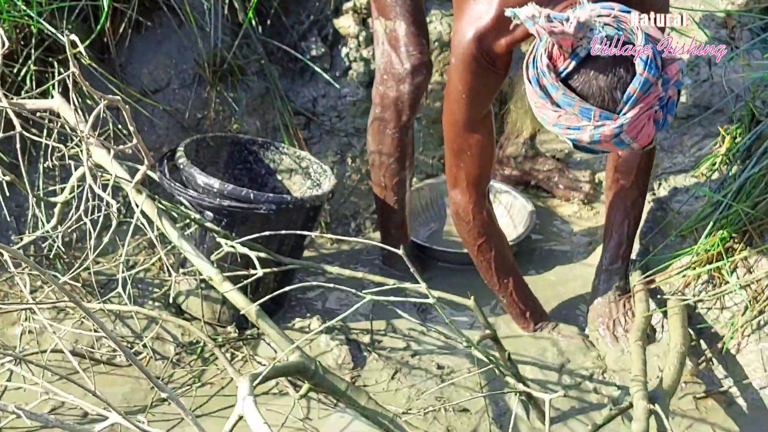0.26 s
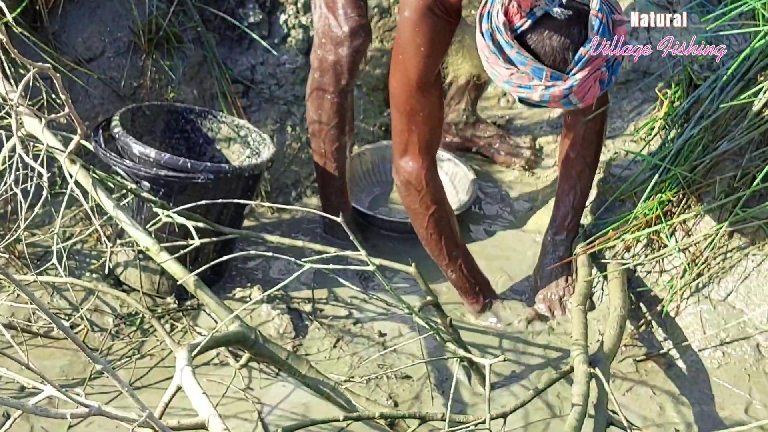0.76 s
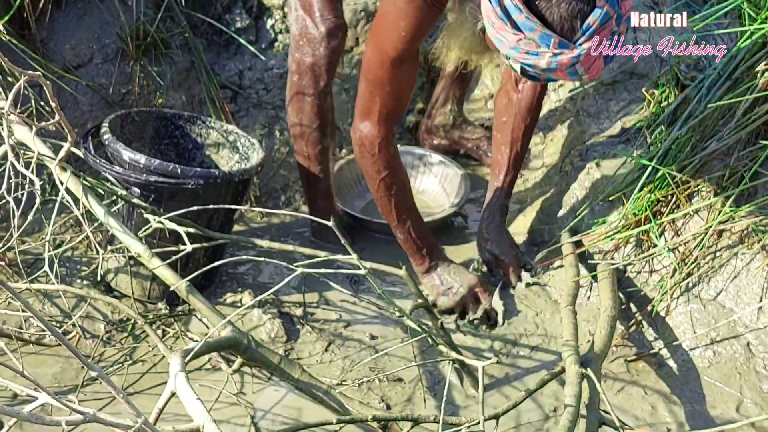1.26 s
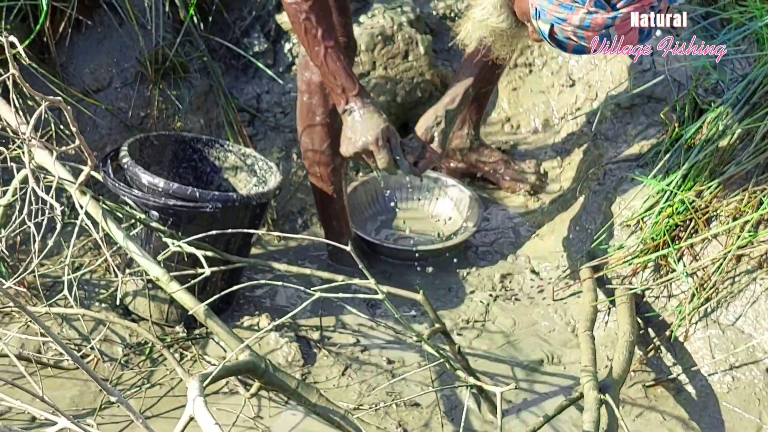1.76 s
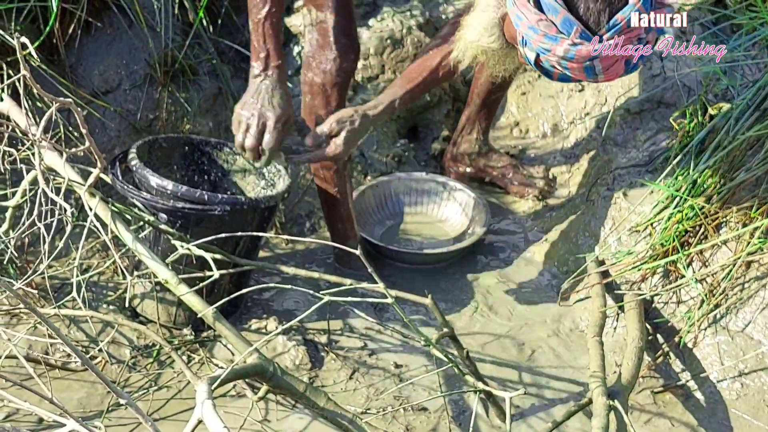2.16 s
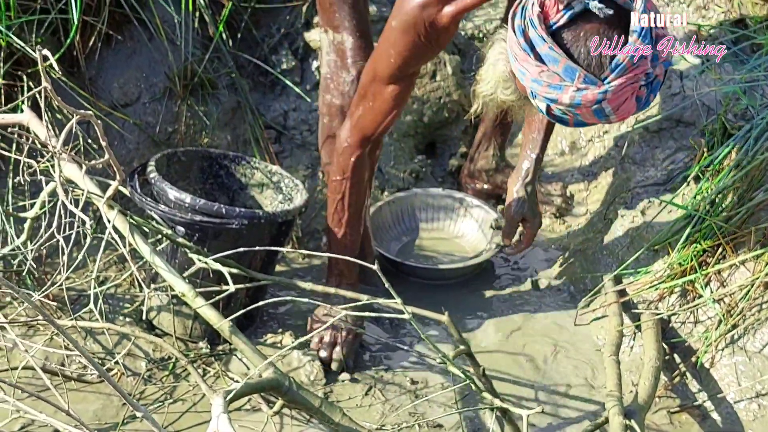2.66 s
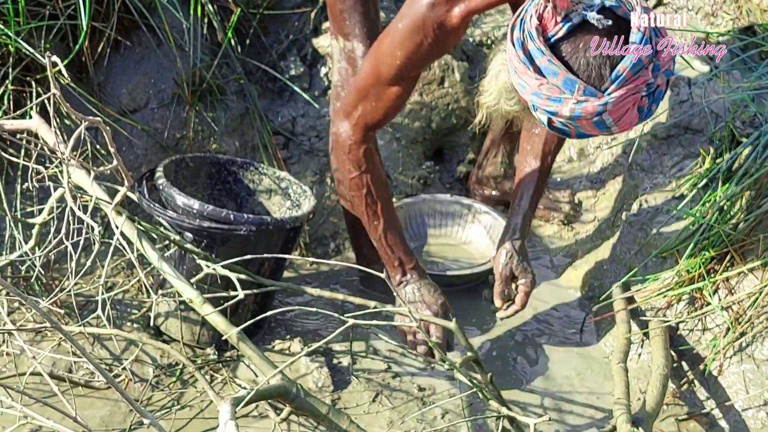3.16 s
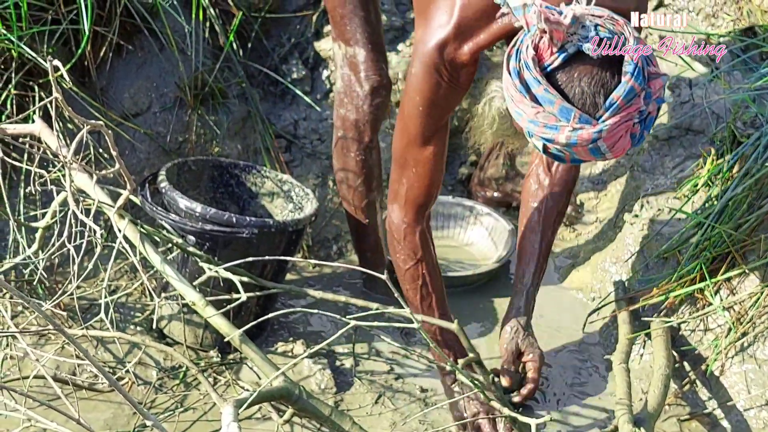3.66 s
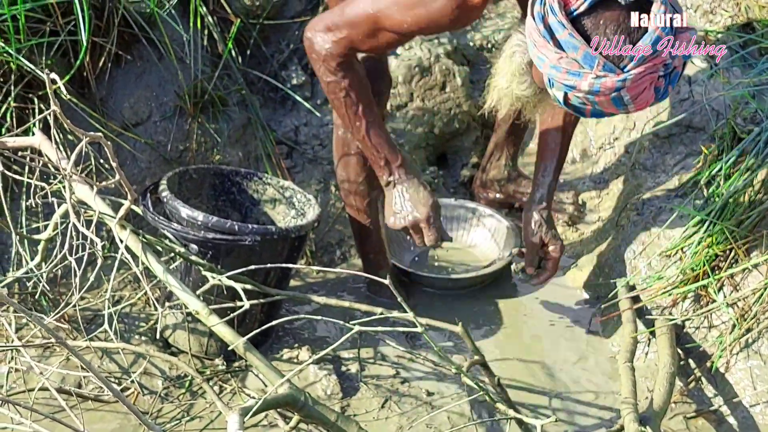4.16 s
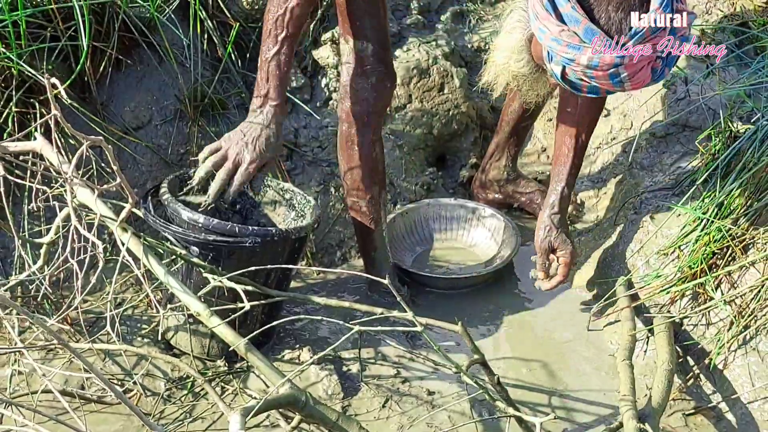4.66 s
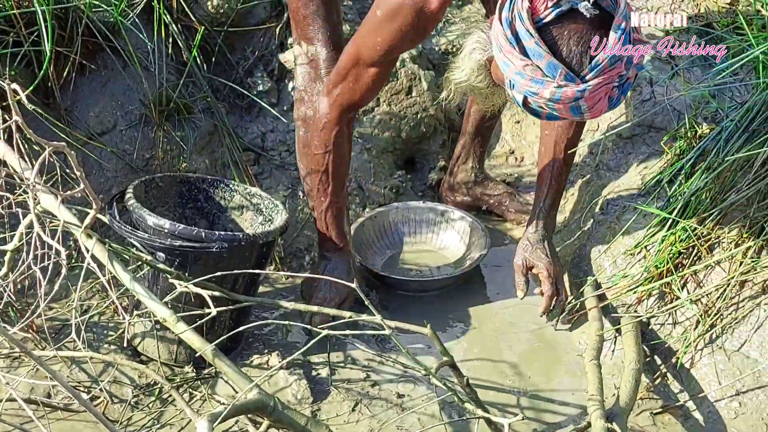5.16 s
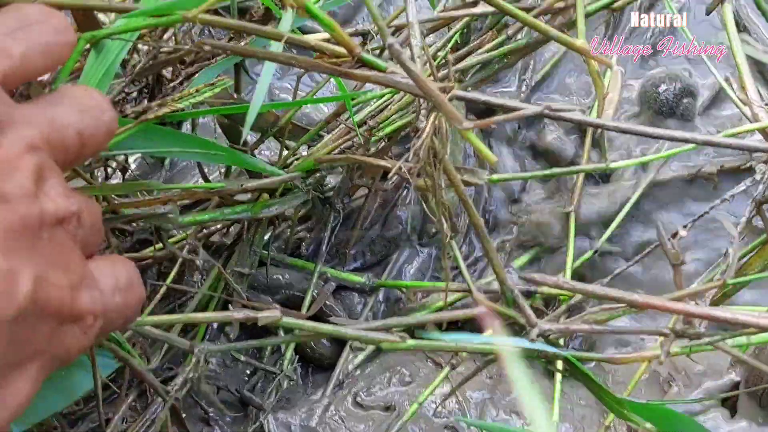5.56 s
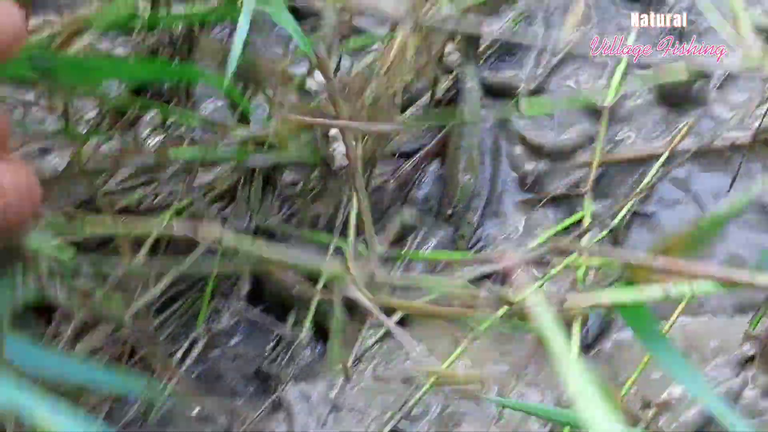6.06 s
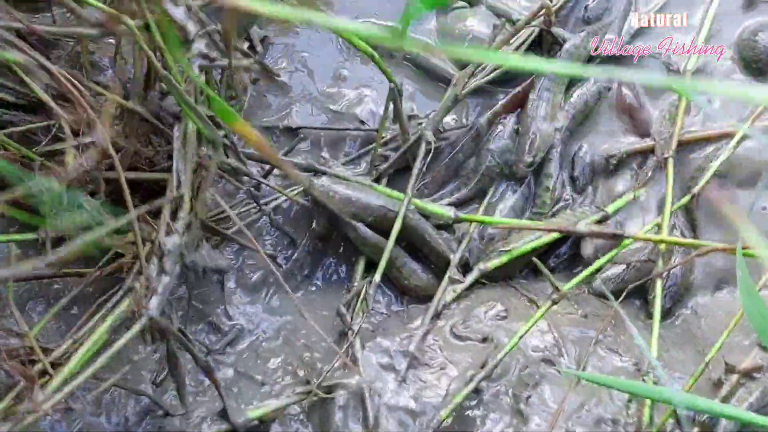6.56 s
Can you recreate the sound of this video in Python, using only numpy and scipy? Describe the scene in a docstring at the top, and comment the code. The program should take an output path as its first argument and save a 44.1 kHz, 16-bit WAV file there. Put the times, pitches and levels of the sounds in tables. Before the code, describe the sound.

Wet squelches, plops and splats of hands picking fish from mud, over a steadily chugging pump engine and faint birdsong.

```python
"""A single-cylinder pump engine thuds across a paddy field, each exhaust pulse ringing its pipe, while
hands pick fish out of wet mud: water films burst, bubbles resonate and lumps spatter. A bird soon sings
buzzy, frequency-modulated notes. From 2.8 s occasional knocks ring the casing at the right microphone
port, and after 4 s the bird adds a rasp, trills and a sweep. Near 5.7 s the listening place changes to
a grassy hollow, where a bank dulls the engine and a wet hiss swells as the fish wriggle."""
import sys
import numpy as np
from scipy import signal
from scipy.fft import rfft, irfft, next_fast_len
from scipy.io import wavfile
from scipy.ndimage import uniform_filter1d, map_coordinates

SR = 44100
rng = np.random.default_rng(int(sys.argv[2]) if len(sys.argv) > 2 else 0)


def materialize(psi):
    """Save the field psi as 16-bit PCM at rate SR to the path in sys.argv[1].

    A 1-D psi becomes a single channel; in a 2-D psi each row is a channel.
    """
    bounded = np.clip(np.atleast_2d(psi).T, -1, 1)
    quanta = np.round(bounded * 32767).astype(np.int16)
    wavfile.write(sys.argv[1], SR, quanta)


N = 299439
TIME = np.arange(N) / SR
MOVE_S = 5.745  # from the open field to the hollow
ROUGHNESS = 0.255  # random share of the bird's pitch flutter

# Spectrum of stirred water: frequency_hz, level_db
SLOSH_SPECTRUM = [(300, 3.5), (500, -4), (750, -9), (1000, -8), (1600, -10.5), (2200, 5), (2800, -4),
                  (4500, -7), (8000, -46)]
# Spectrum of fine spray: frequency_hz, level_db
SPRAY_SPECTRUM = [(710, -54), (1200, -65), (2220, -18), (3270, -11), (3850, 1), (6250, -5), (7590, -0.5),
                  (8730, -5.5), (10500, 4), (14700, 2), (15800, -11)]


def amp(db):
    """Amplitude ratio of a level in decibels."""
    return 10 ** (np.asarray(db) / 20)


def unit(x):
    """Normalisation to an rms of 1."""
    return x / np.sqrt(np.mean(x ** 2) + 1e-20)


def gain(points, size):
    """Magnitude response on an FFT grid, interpolated from (frequency_hz, level_db) points."""
    hz, db = np.transpose(points)
    return amp(np.interp(np.log(np.fft.rfftfreq(size, 1 / SR) + 1), np.log(hz), db))


def colour(x, points):
    """Zero-phase filtering by a response of (frequency_hz, level_db) points."""
    size = next_fast_len(x.shape[-1] + 4096)
    return irfft(rfft(x, size) * gain(points, size), size)[..., :x.shape[-1]]


def impulse(points, size=8192):
    """Minimum-phase pulse of peak 1 with the given spectrum, by folding the cepstrum."""
    cepstrum = irfft(np.log(gain(points, size)))
    cepstrum[1:size // 2] *= 2
    cepstrum[size // 2 + 1:] = 0
    pulse = irfft(np.exp(rfft(cepstrum)))
    return pulse / np.abs(pulse).max()


def curves(rows):
    """Linear interpolation, sample by sample, of each column after the time."""
    times, *columns = np.transpose(rows)
    return [np.interp(TIME, times, column) for column in columns]


def during(rows):
    """A gate from the first row's time to the last, with 10 ms ramps."""
    return np.clip(np.minimum(TIME - rows[0][0], rows[-1][0] - TIME) * 100, 0, 1)


def wobble(rate_hz):
    """Smooth random modulation: a spline through Gaussian knots."""
    knots = rng.standard_normal(int(N * rate_hz / SR) + 4)
    return map_coordinates(knots, [TIME * rate_hz])


def pan(left_db):
    """Channel gains for a level difference, left minus right."""
    return amp([[left_db / 2], [-left_db / 2]])


def ports(x, right_lead_s):
    """Arrival-time difference: the wave reaches the right microphone port first."""
    return np.array([np.interp(TIME + side * right_lead_s / 2, TIME, x) for side in (-1, 1)])


def noise_pair(correlation, size=N):
    """Two white noises, partly coherent through a shared component."""
    noise = rng.standard_normal((3, size))
    return np.sqrt(correlation) * noise[0] + np.sqrt(1 - correlation) * noise[1:]


def add(track, start_s, sound):
    """Superposition of a sound on the track."""
    start = max(round(start_s * SR), 0)
    part = track[..., start:start + sound.shape[-1]]
    part += sound[..., :part.shape[-1]]


def move(in_field, in_hollow):
    """A 5 ms crossfade between the two listening places."""
    share = np.clip((TIME - MOVE_S) * 200, 0, 1)
    return (1 - share) * in_field + share * in_hollow


def background():
    """Steady noise of faint air and engine rumble; in the hollow the bank casts an acoustic shadow."""
    # Spectra of the rumble and of the open air: frequency_hz, level_db
    rumble_spectrum = [(20, -40), (36, -47), (43, -60), (50, -1), (75, 4), (95, -4), (125, 1), (240, -9.5),
                       (330, -9), (430, -26.5), (700, -87)]
    air_spectrum = [(240, -18), (400, -0.5), (535, -8), (784, -6), (1300, -8.5), (1790, -12.5), (3250, -25),
                    (4290, -23), (6780, -34), (8530, -33.5), (11100, -25.5), (13500, -26), (15500, -39)]
    # Shielding by the bank: frequency_hz, gain_db
    bank_response = [(50, -2), (100, -4), (240, -7), (340, -7)]
    rumble = amp(-41.5) * unit(colour(noise_pair(0.84), rumble_spectrum)) * pan(-2.6)
    air_db = np.where(TIME < MOVE_S, -56.7, -66) + wobble(3.93)
    air = amp(air_db) * unit(colour(noise_pair(0.061), air_spectrum)) * pan(1)
    return move(rumble, colour(rumble, bank_response)) + air


def scattered(x, t60_s):
    """Diffuse reflection from grass and banks: a decaying noise response for each channel."""
    t = np.arange(SR // 5) / SR
    tail = rng.standard_normal((2, len(t))) * amp(-60 * t / t60_s)
    return signal.fftconvolve(x[None], tail / np.linalg.norm(tail[0]), axes=1)[:, :N]


def bird_note(length_s, start_hz, end_hz, depth, overtone_db, buzz_hz=172.5):
    """Uneven flutter of the syrinx modulates the frequency of an arched glide into a buzz."""
    t = np.arange(int(length_s * SR)) / SR
    progress = t / length_s
    arch = np.sin(np.pi * progress)
    hz = (start_hz + (end_hz - start_hz) * progress) * (1 + 0.0156 * arch)
    waver, drift = (unit(uniform_filter1d(rng.standard_normal(len(t)), size=90)) for _ in range(2))
    flutter = np.sin(2 * np.pi * buzz_hz * np.cumsum(1 + 0.096 * drift) / SR)
    phase = 2 * np.pi * np.cumsum(hz * (1 + depth * (flutter + ROUGHNESS * waver))) / SR
    swell = np.sqrt(np.abs(arch)) * (1 + 0.044 * flutter)
    return swell * (np.sin(phase) + amp(overtone_db) * (np.sin(2 * phase) + 1.6 * np.sin(3 * phase)))


def bird_rasp(pulse_hz=170, slide=0.08):
    """Amplitude modulation cuts a reedy, inharmonic tone into a fast train of falling chirps."""
    # A call that swells as it rises, then is held softly: time_s, pitch_hz, level_db
    contour = [(4.19, 2800, -66), (4.23, 3350, -52), (4.28, 3580, -48.5), (4.36, 3680, -49),
               (4.41, 3900, -53), (4.46, 4350, -48), (4.56, 4550, -46), (4.61, 3700, -66), (4.7, 3500, -60),
               (4.78, 3600, -54), (4.88, 3570, -58.5), (4.97, 3600, -60)]
    # Partials of the voice: frequency_ratio, level_db
    partials = [(1, 0), (.83, -10), (1.8, -19), (2, -21), (2.68, -19), (3.05, -24)]
    hz, db = curves(contour)
    cycle = np.cumsum(pulse_hz * (1 + .03 * wobble(40))) / SR % 1
    phase = 2 * np.pi * np.cumsum(hz * (1 + slide * (.5 - cycle) + .02 * wobble(500))) / SR
    voice = sum(amp(level_db) * np.sin(ratio * phase) for ratio, level_db in partials)
    pulses = unit(np.sin(np.pi * cycle) ** 2)
    call = amp(db + 1 + wobble(150)) * during(contour) * pulses * voice
    return call * pan(-3) + amp(-9) * scattered(call, t60_s=.04)


def bird_sweep(buzz_hz=152):
    """A whistle rises and falls back; deeper frequency modulation roughens it near the top."""
    # Course of the whistle: time_s, pitch_hz, level_db, buzz_depth_ratio
    contour = [(5.38, 3450, -60, .05), (5.46, 3980, -47, .05), (5.485, 4150, -40, .05),
               (5.525, 4520, -40, .055), (5.555, 4850, -41, .1), (5.582, 4720, -44, .1),
               (5.605, 4200, -52, .09), (5.665, 3850, -56, .07)]
    hz, db, depth = curves(contour)
    flutter = np.sin(2 * np.pi * np.cumsum(buzz_hz * (1 + .05 * wobble(40))) / SR)
    phase = 2 * np.pi * np.cumsum(hz * (1 + depth * (flutter + ROUGHNESS * wobble(500)))) / SR
    call = amp(db - 2) * during(contour) * (1 + 0.16 * flutter) * np.sin(phase)
    return call * pan(-2) + amp(-7) * scattered(call, t60_s=.04)


def bird():
    """Notes, trills, rasp and sweep arrive as direct sound plus diffuse reflections."""
    # Buzzy notes: start_s, length_s, start_hz, end_hz, level_db, buzz_depth_ratio
    notes = [(0.565, 0.068, 4080, 3750, -63.5, 0.045), (0.566, 0.12, 2484, 2280, -60, 0.049),
             (1.04, 0.067, 4080, 4400, -66.5, 0.022), (3.25, 0.11, 4460, 4770, -65.5, 0.06),
             (3.367, 0.086, 4170, 5520, -61.5, 0.064), (3.433, 0.12, 5800, 5400, -65.5, 0.023),
             (3.54, 0.046, 5400, 4570, -70, .045), (3.57, 0.15, 4070, 4380, -62, 0.085),
             (3.82, 0.038, 4200, 3600, -58, 0.059), (3.882, 0.084, 1920, 2370, -58, 0.059),
             (4.07, 0.13, 2330, 2630, -60.5, 0.096), (5.159, 0.21, 3890, 4220, -57.5, 0.1),
             (5.655, 0.095, 2610, 2270, -54, 0.047), (5.893, 0.13, 3060, 4730, -65, 0.026)]
    # Runs of four clear falling chirps: start_s, spacing_s, start_hz, end_hz, level_db
    trills = [(4.873, .017, 7200, 4400, -60), (4.948, .037, 3950, 3200, -51)]
    song = np.zeros(N)
    for start_s, length_s, start_hz, end_hz, db, depth in notes:
        add(song, start_s, amp(db) * bird_note(length_s, start_hz, end_hz, depth, overtone_db=-33))
    for start_s, spacing_s, start_hz, end_hz, db in trills:
        for k in range(4):
            chirp = bird_note(.6 * spacing_s, start_hz, end_hz, depth=.015, overtone_db=-30)
            add(song, start_s + k * spacing_s, amp(db) * chirp)
    return amp(4) * song + amp(5.5) * scattered(song, t60_s=.039) + bird_rasp() + bird_sweep()


def knocks():
    """An impact at the right port clicks and excites the damped modes of the casing."""
    # Impacts: start_s, level_db
    taps = [(2.8154, -17), (2.8205, -6), (4.0567, 12), (4.0632, -5), (5.066, -6.5), (5.0756, -9.5),
            (5.0879, -13), (5.097, -15), (5.699, -20.5), (5.7393, -21.5)]
    # Modes of the casing: frequency_hz, level_db, t60_s
    modes = [(55.4, -19, 0.24), (136, -9.5, 0.055), (246, -10.5, 0.053), (325, -6, 0.03), (504, -7, 0.021),
             (647, -6, 0.015), (793, -15.5, 0.013), (1100, -14, 0.011)]
    click_spectrum = [(500, 28.5), (1150, 4), (1700, -33), (2700, 16.5), (5500, -18), (15000, -4)]
    out, t = np.zeros(N), np.arange(SR // 5) / SR
    ring = sum(amp(db - 60 * t / t60_s) * np.sin(2 * np.pi * hz * t) for hz, db, t60_s in modes)
    hardest_db = max(db for _, db in taps)
    for start_s, db in taps:
        click = unit(colour(rng.standard_normal(len(t)), click_spectrum))
        click_db = -4.5 - .3 * min(hardest_db - db, 10) - 60 * t / 0.011  # soft taps are duller
        add(out, start_s, amp(db - 9.5) * (amp(click_db) * click - ring))
    highpass = signal.butter(2, 70, "high", fs=SR, output="sos")
    return signal.sosfilt(highpass, out) * amp([[-25], [0]])


def ticks(rate_hz, spread_db, size=N):
    """Shot noise: tiny decaying bursts at random times and of scattered strength."""
    strengths = amp(spread_db * np.minimum(rng.exponential(size=size), 3))
    pops = (rng.random(size) < rate_hz / SR) * strengths * rng.choice([-1, 1], size)
    decay = np.exp(-np.arange(SR // 200) / (0.00039 * SR))
    return unit(signal.fftconvolve(pops, decay)[:size] * noise_pair(0.0093, size))


def crackle(spectrum, rate_hz, spread_db, fizz):
    """Bursting water films make shot noise over a continuous fizz."""
    return unit(colour(ticks(rate_hz, spread_db) + fizz * noise_pair(0.3), spectrum))


def bubbles(rate_hz, centre_hz, scatter, spread_db, cycles):
    """Air pockets resonate at random times, rising in pitch; the higher ones die away sooner."""
    count = int(rate_hz * N / SR)
    onset, left_share, phase_shift = rng.random((count, 3)).T[..., None]
    pitch, strength = np.clip(rng.standard_normal((count, 2)), -2, 2).T[..., None]
    hz = centre_hz * np.exp(scatter * pitch)
    t = np.arange(SR // 40) / SR
    age = t * hz / cycles
    envelope = amp(spread_db * strength) * np.exp(-age) * (1 - np.exp(-4 * age))
    phase = 2 * np.pi * hz * t * (1 + 0.0048 * age)
    left = left_share * envelope * np.sin(phase)
    right = (1 - left_share) * envelope * np.sin(phase + np.pi * phase_shift)
    samples = ((onset * N).astype(int) + np.arange(len(t))).ravel()
    return unit(np.array([np.bincount(samples, ring.ravel(), N)[:N] for ring in (left, right)]))


def wriggling_fish(start_s=6.105, rise_s=0.36, trickle_lead_s=0.16):
    """Films burst and bubbles ring among the fish, swelling as they begin to wriggle."""
    # Spectrum of fizzing water: frequency_hz, level_db
    hiss_spectrum = [(350, -6.5), (520, 2.5), (750, -12), (1200, -13), (2200, -2.5), (3400, -6), (4100, -2),
                     (5900, -6.5), (7400, -3.5), (8600, -7), (11000, 0), (13300, 1.5), (15800, -2)]
    effort = (TIME - start_s) / rise_s
    hiss_db = np.interp(effort, [0, 1], [-51.5, -35.5]) + 0.096 * wobble(2.5)
    trickle_db = np.interp(effort + trickle_lead_s / rise_s, [0, 1], [-66.5, -53.5])
    hiss = crackle(hiss_spectrum, rate_hz=900, spread_db=4, fizz=1.1)
    clumps = amp(4 * wobble(30))
    drops = unit(clumps * bubbles(rate_hz=150, centre_hz=2350, scatter=.25, spread_db=5.5, cycles=4))
    trickle = drops + crackle(SLOSH_SPECTRUM, rate_hz=120, spread_db=5, fizz=0.39)
    return amp(hiss_db) * hiss * pan(-4) + amp(trickle_db) * trickle * pan(-2.6)


def stroke(peak_s, length_s, press_share=0.57, range_db=23):
    """Force grows exponentially as a hand presses in and decays as it draws out."""
    offset = (TIME - peak_s) / length_s
    return amp(-range_db * np.maximum(-offset / press_share, offset / (1 - press_share)))


def hands():
    """Fingers squeeze crackle from the mud and stir the water; overlapping strokes add in power."""
    # Strokes through the mud: peak_s, length_s, crackle_db, slosh_db
    strokes = [(0.064, 1, -47.5, -50.5), (0.83, 1, -53, -89), (1.408, 0.19, -43.5, -40.5),
               (1.557, 1, -47.5, -40), (1.948, 1, -48.5, -68), (2.274, 0.4, -47, -43.5),
               (2.725, 1, -56, -54), (3.205, 0.28, -54.5, -44.5), (4.532, 0.37, -41.5, -43),
               (4.667, 0.83, -49.5, -51), (5.105, 0.34, -45, -39), (5.316, 0.26, -38.5, -63),
               (5.515, 1, -44.5, -50)]
    # Spectrum of squeezed mud: frequency_hz, level_db
    mud_spectrum = [(1470, -34), (2500, -3), (3220, 4), (4360, 6.5), (6210, -1.5), (7650, -1), (8660, -3.5),
                    (10300, 2.5), (12800, 2.5), (15100, -3), (15800, 5.5)]
    seep_db, lap_db = -70, -54.5  # what remains between strokes
    forces = np.array([stroke(peak_s, length_s) for peak_s, length_s, _, _ in strokes])
    _, _, crackle_db, slosh_db = np.transpose(strokes)
    squeeze = np.hypot(amp(seep_db), np.linalg.norm(amp(crackle_db)[:, None] * forces, axis=0))
    stir = np.hypot(amp(lap_db), np.linalg.norm(amp(slosh_db)[:, None] * forces, axis=0))
    flicker = amp(-1 + 3 * wobble(18) + 3 * wobble(110))
    squelch = squeeze * flicker * crackle(mud_spectrum, rate_hz=200, spread_db=4.5, fizz=.85)
    pops = amp(-65.5) * bubbles(rate_hz=49, centre_hz=2460, scatter=0.203, spread_db=-1.5, cycles=8.2)
    wash = amp(-7 + 2 * wobble(70)) * crackle(SLOSH_SPECTRUM, rate_hz=320, spread_db=4, fizz=0.7)
    churn = np.minimum(stir / amp(-37), 1)  # harder stirring traps more air
    small = bubbles(rate_hz=600, centre_hz=2250, scatter=.16, spread_db=3, cycles=6)
    large = bubbles(rate_hz=400, centre_hz=1050, scatter=.2, spread_db=3, cycles=4)
    gurgle = churn * (amp(-5.5) * small + amp(-6.5) * large)
    return (squelch + pops) * pan(-2.9) + stir * (wash + gurgle) * pan(-9)


def plops(t60_s=0.05):
    """Single bubbles ring as damped resonators of rising pitch, with a wet band of noise."""
    # Bubbles popping in the mud: start_s, pitch_hz, level_db
    pops = [(0.125, 1360, -22), (.126, 1150, -32), (0.126, 2140, -26), (0.153, 2220, -28.5),
            (.272, 2430, -44), (0.395, 2750, -41), (.483, 2250, -34), (0.869, 2710, -46),
            (0.332, 2540, -44), (.566, 2450, -38), (0.945, 2710, -43), (1.02, 2650, -46.5),
            (1.2326, 2140, -39), (2.637, 2500, -43.5), (2.745, 3050, -53), (2.955, 2310, -40),
            (3.018, 2190, -42), (3.153, 2820, -33), (1.373, 2260, -29), (1.391, 2340, -31),
            (1.42, 2320, -29), (1.438, 1070, -30.5), (1.441, 2110, -30), (1.469, 910, -26.5),
            (1.485, 2230, -25), (1.513, 980, -26.5), (1.513, 2120, -25.5), (1.525, 790, -31.5),
            (1.664, 2660, -29.5), (1.777, 780, -36), (2.276, 2430, -30), (3.765, 4200, -28.5),
            (3.977, 2440, -34), (4.915, 880, -27), (4.963, 2104, -25), (4.9645, 3320, -34.5),
            (5.101, 1310, -31), (5.112, 910, -32), (5.726, 2310, -29), (5.851, 1720, -42),
            (6.259, 3510, -34), (6.283, 2290, -33), (6.31, 1940, -35), (6.328, 2130, -34),
            (6.379, 2460, -28.5), (6.443, 2400, -35), (6.485, 2120, -23.5), (6.65, 2190, -29.5),
            (6.73, 928, -29.5), (6.776, 2600, -27)]
    out, t = np.zeros((2, N)), np.arange(SR // 10) / SR
    attack = 1 - np.exp(-t / 0.00015)
    for start_s, hz, db in pops:
        tone = np.sin(2 * np.pi * hz * (t + 0.116 * t * t / t60_s))
        band = [(hz / 2, -25), (hz, 0), (hz * 2, -20), (hz * 4, -40)]
        edge = unit(colour(noise_pair(0.66, len(t)), band))
        add(out, start_s, amp(db - 60 * t / t60_s) * attack * (0.36 * tone + 0.18 * edge))
    return out * pan(-12)


def snaps(film_t60_s=0.038, slap_t60_s=0.009):
    """Broadband transients: a water film ruptures with a bright spit; a hard slap is shorter still."""
    # Films breaking between the fingers: start_s, level_db
    films = [(0.106, -34.5), (1.1807, -40), (1.2346, -35), (1.3284, -36), (1.4825, -35), (1.501, -31),
             (1.798, -33), (2.0562, -37), (2.1308, -38.5), (2.2099, -32), (2.248, -42), (2.2787, -33),
             (2.308, -31.5), (2.7323, -34), (3.2121, -40), (3.7614, -37), (4.0257, -42), (4.365, -40),
             (4.6349, -46), (4.6962, -39), (4.7396, -38), (4.786, -42), (5.193, -24), (5.259, -41),
             (5.3925, -33.5)]
    # Slaps of mud on water: start_s, level_db
    slaps = [(.2048, -25), (1.2512, -29), (1.3447, -27), (1.6113, -22), (1.6314, -14), (1.634, -20),
             (1.8422, -20), (2.2599, -28), (2.4108, -33), (4.566, -26), (5.0997, -28), (5.1352, -25),
             (5.4375, -20), (6.0625, -26)]
    out, t = np.zeros((2, N)), np.arange(SR // 20) / SR
    attack = 1 - np.exp(-t / 0.00028)
    for start_s, db in films:
        spit = unit(colour(noise_pair(.1, len(t)), SPRAY_SPECTRUM))
        add(out, start_s, amp(db - 9 - 60 * t / film_t60_s) * attack * spit)
    for start_s, db in slaps:
        click = unit(colour(noise_pair(0.12, len(t)), SPRAY_SPECTRUM))
        add(out, start_s, amp(db - 5 - 60 * t / slap_t60_s) * click)
    return out * pan(-5)


def splats():
    """Impact noise of wet mud: a quick soft rise, a fast decay and a tail of spray."""
    # Lumps landing: start_s, level_db, relative_body_db, decay_s, rise_s
    lumps = [(0.2051, -29.5, 8.5, 0.017, 0.0021), (0.7023, -24.5, -27, 0.13, 0.0015),
             (1.248, -36, -3.5, 0.15, 0.0054), (1.3436, -32.5, 8.5, 0.11, 0.002),
             (1.613, -24, -20, 0.084, 0.0016), (1.632, -25, -25, 0.06, 0.0023),
             (1.8353, -20, -8, 0.04, 0.0044), (1.958, -31.5, -3, 0.51, 0.0024),
             (2.0022, -32.5, -2.5, .04, 0.0032), (2.261, -32, 4, 0.075, 0.002),
             (2.389, -25.5, -10, 0.038, 0.0034), (3.1528, -40, 1.5, 0.047, 0.0037),
             (3.226, -38, -19, 0.053, 0.0054), (4.565, -25, 1.5, 0.017, 0.0038),
             (5.098, -29, 3, 0.24, .002), (5.1333, -18.5, -10, 0.033, 0.003),
             (5.1599, -13, -11, 0.026, 0.0017), (5.284, -23, -5.5, 0.046, 0.0036),
             (5.3125, -27, -4, 0.13, 0.0047), (5.3312, -22, -6, 0.013, 0.0046),
             (5.4307, -21, -9, 0.051, 0.0065), (5.5124, -26.5, -26, .022, 0.002),
             (6.057, -27, -1.5, 0.08, 0.0052), (6.4848, -23.5, -2.5, 0.027, 0.0018)]
    body_spectrum = [(500, -46), (1300, -6), (2300, 2), (3500, 2.5), (5000, 2), (8000, -29)]
    out, clock = np.zeros((2, N)), np.arange(-SR // 40, SR // 6) / SR
    t = np.maximum(clock, 0)
    soft_onset = amp(-23) * np.exp(-np.abs(clock) / .008)
    for start_s, db, body_db, decay_s, rise_s in lumps:
        rise = 1 - np.exp(-(t / rise_s) ** 2)
        impact = rise * (amp(-60 * t / (0.46 * decay_s)) + amp(-12 - 60 * t / (2.6 * decay_s)))
        envelope = amp(db - 10) * (impact / impact.max() + soft_onset)
        patter = ticks(rate_hz=2600, spread_db=3, size=len(t)) + noise_pair(.1, len(t))
        spray = unit(colour(patter, SPRAY_SPECTRUM))
        body = unit(colour(noise_pair(0.12, len(t)), body_spectrum))
        add(out, start_s - .001 + clock[0], envelope * (spray + amp(body_db) * body))
    return out * pan(-7)


def firings(first_s, lead_s, scatter_db):
    """A nearly periodic impulse train, one impulse for each opening of the exhaust valve."""
    # Engine speed: time_s, firing_rate_hz
    speed = [(0, 15.373), (1.9, 15.629), (2.8, 15.899), (3.5, 15.749), (4.4, 15.8), (5.0, 15.97),
             (5.75, 15.673), (6.8, 15.78)]
    cycles = np.cumsum(curves(speed)[0]) / SR
    cycles -= np.interp(first_s, TIME, cycles)
    times = np.interp(np.arange(int(cycles[-1]) + 1), cycles, TIME) - lead_s
    strengths = amp(scatter_db * rng.standard_normal(len(times)))
    return np.bincount(np.maximum(times * SR, 0).astype(int), strengths, N)[:N]


def decay_after(blows, rise_s, t60_s):
    """An envelope that rises at each blow and decays exponentially."""
    t = np.arange(SR // 4) / SR
    response = (1 - np.exp(-t / rise_s)) * amp(-60 * t / t60_s)
    return unit(signal.fftconvolve(blows, response)[:N])


def exhaust(puff_hz=207.7, width_s=.002, boom_hz=91.7, pipe_hz=246.9):
    """One pressure pulse excites the pipe's resonances, a boom and a note, and echoes off a bank."""
    t = np.arange(SR // 6) / SR
    puff, echo, late_echo = (
        np.exp(-.5 * ((t - at_s) / width_s) ** 2) * np.sin(2 * np.pi * puff_hz * (t - at_s) - .35)
        for at_s in (0.00535, 0.01356, 0.02554))
    boom = np.sin(2 * np.pi * boom_hz * t) * (1 - np.exp(-(t / 0.0078) ** 2)) * amp(-5 - 60 * t / 0.11)
    note = np.sin(2 * np.pi * pipe_hz * t) * (1 - np.exp(-t / 0.0016)) * amp(-22.5 - 60 * t / 0.22)
    return puff - boom - note + amp(-13.5) * (echo + 0.85 * late_echo)


def engine_in_hollow(boom_hz=96):
    """In the bank's acoustic shadow each firing is a dull thud and a low boom; both grow louder."""
    # Spectrum of one thud behind the bank: frequency_hz, level_db
    thud_spectrum = [(25, -35), (55, -22), (100, 2), (160, -9), (240, -5), (320, -22.5), (450, -23.5),
                     (700, -53)]
    # Strength of the firings: time_s, level_db
    levels = [(5.8, -2.5), (6.28, -1), (6.45, 2), (6.79, 3.5)]
    roll_spectrum = [(35, -22), (65, -0.5), (125, 1), (175, -8), (240, -1), (310, -15),
                     (450, -25), (700, -51)]
    blows = firings(first_s=5.7885, lead_s=0.003, scatter_db=.3)
    t = np.arange(SR // 8) / SR
    boom = np.sin(2 * np.pi * boom_hz * t) * (1 - np.exp(-(t / .012) ** 2)) * amp(2 - 60 * t / .12)
    thuds = amp(-32.5) * signal.fftconvolve(blows, impulse(thud_spectrum)[:len(t)] - boom)[:N]
    swell = decay_after(blows, rise_s=0.005, t60_s=0.13)
    roll = amp(-46.5) * swell * unit(colour(noise_pair(0.82), roll_spectrum))
    return amp(curves(levels)[0]) * (thuds + roll) * pan(-1.6)


def engine_in_field(first_s=.0076):
    """Exhaust pulses arrive directly and as a scattered roll; each firing clacks, then valves rattle."""
    # Spectra of the scattered exhaust and of the mechanical impacts: frequency_hz, level_db
    roll_spectrum = [(40, 5.5), (70, 20.5), (120, 6.5), (240, 13), (330, 12), (430, -32), (600, -66)]
    clatter_spectrum = [(300, -36), (500, -4.5), (850, -7), (1150, 3), (1500, -1.5), (1900, 4.5),
                        (2300, -6), (2800, -17), (4500, -11), (9000, -42)]
    blows = firings(first_s, lead_s=.005, scatter_db=.6)
    thuds = amp(-22) * ports(signal.fftconvolve(blows, exhaust())[:N], right_lead_s=0.00028)
    swell = decay_after(blows, rise_s=.003, t60_s=.13)
    roll = amp(-44.5) * swell * unit(colour(noise_pair(0.69), roll_spectrum))
    clacks = decay_after(firings(first_s, lead_s=.0028, scatter_db=2.8), rise_s=.0008, t60_s=.028)
    valve_hits = sum(firings(first_s, lead_s=-late_s, scatter_db=4) for late_s in (.008, .014, .02))
    rattle = amp(-10) * decay_after(valve_hits, rise_s=.0004, t60_s=.016)
    clatter = amp(-57.3) * (clacks + rattle) * unit(colour(noise_pair(0.13), clatter_spectrum))
    return (thuds + roll) * pan(-1.7) + clatter * pan(-5)


def scene():
    """Superposition of all sources, first in the open field and then in the hollow."""
    places = move(engine_in_field() + hands(), engine_in_hollow() + wriggling_fish())
    return places + background() + splats() + snaps() + plops() + knocks() + bird()


def record(dry):
    """Soft saturation rounds the largest peaks; a band-pass thins the deepest bass and cuts the top."""
    ceiling, top_hz = .82, 15720
    rounded = dry / (1 + (dry / ceiling) ** 6) ** (1 / 6)
    passband = [(20, -12), (36, -7), (46, 0),
                (top_hz - 200, 0), (top_hz + 300, -30), (top_hz + 1000, -100)]
    return colour(rounded, passband)


dry = scene()
out = record(dry)
materialize(out)
```